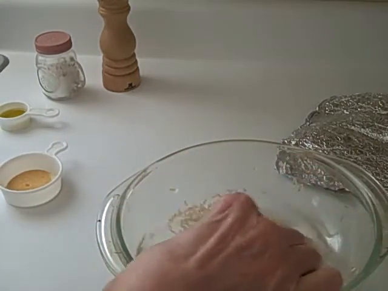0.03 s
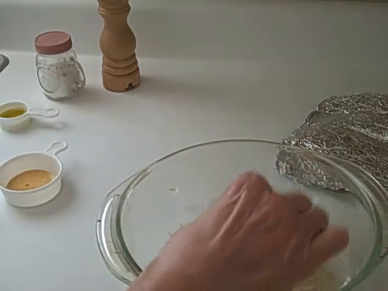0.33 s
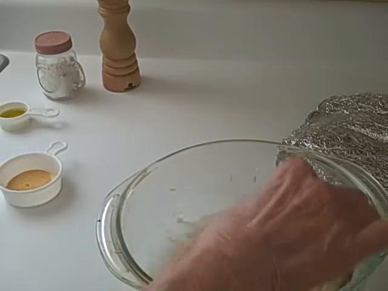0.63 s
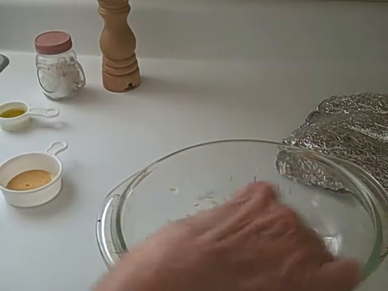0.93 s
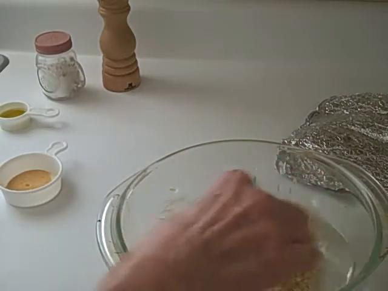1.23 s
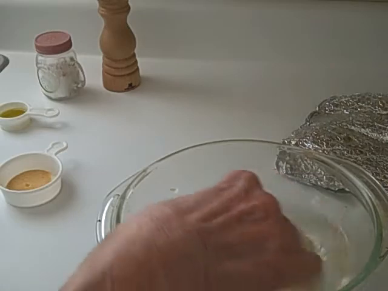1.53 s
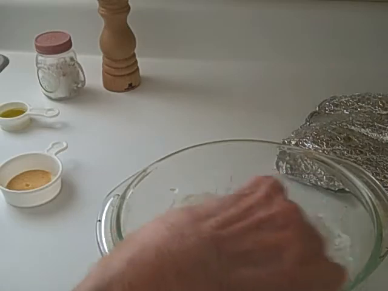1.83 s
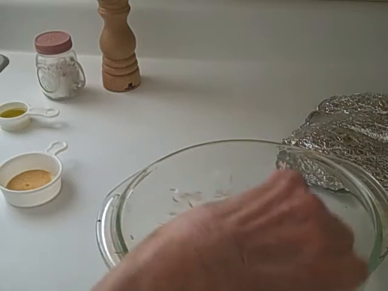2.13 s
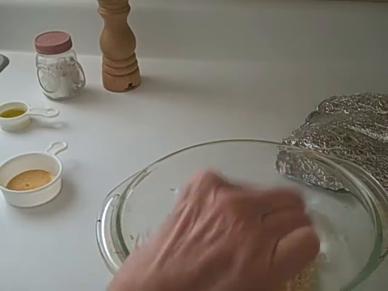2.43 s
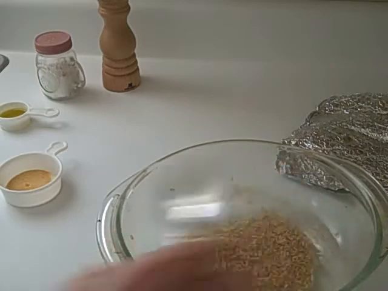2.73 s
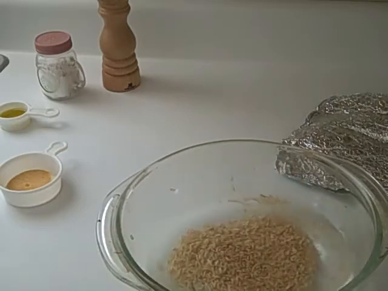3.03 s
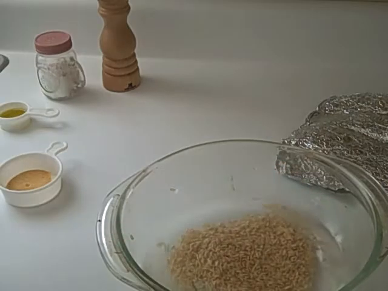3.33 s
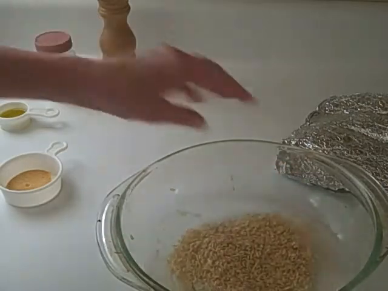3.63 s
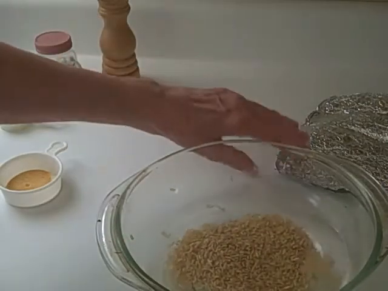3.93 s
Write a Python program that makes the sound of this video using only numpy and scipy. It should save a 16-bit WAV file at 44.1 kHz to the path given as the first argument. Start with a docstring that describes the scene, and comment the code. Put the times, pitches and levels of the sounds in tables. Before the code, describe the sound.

In a small kitchen, dry rice slides around a glass dish under a hand, with light finger bumps and skittering grains. It stops, an arm swishes softly, and several short knocks ring the counter and glass over faint hiss.

```python
"""Kitchen counter, small room: a hand spreads dry rice around a glass dish in several strokes.
Grains tick on the glass and excite the hollow under the hand; fingers bump the dish and stray
grains fall. A faint tone wavers and one finger squeaks. After a pause the arm swishes away and
back, and knocks ring counter and glass. Low rumble and hiss lie underneath."""
import sys
import numpy as np
from scipy import signal
from scipy.fft import rfft, irfft
from scipy.io import wavfile
from scipy.ndimage import uniform_filter1d

SR = 44100
rng = np.random.default_rng(int(sys.argv[2]) if len(sys.argv) > 2 else 0)


def to_wav(s):
    """Save 16-bit WAV."""
    ch = np.atleast_2d(s).T  # columns
    pcm = np.round(np.clip(ch, -1, 1) * 32767)  # PCM
    wavfile.write(sys.argv[1], SR, pcm.astype(np.int16))


N = 176400
TIME_S = np.arange(N) / SR

# room decay (frequency [Hz], t60 [s])
ROOM_T60 = [(300, 0.25), (800, 0.47), (2100, 0.25), (5500, 0.16), (14000, 0.22)]
# early reflections (delay [s], gain)
REFLECTIONS = [(.0023, 0.051), (.0047, -0.25), (.011, .2)]
# background spectrum (frequency [Hz], relative level [dB])
FLOOR_SPECTRUM = [(10, 9.5), (28, -6), (45, -9), (100, -10.5), (140, -12.5), (480, -14.5), (900, -16.5),
                  (1700, -17.5), (4000, -23), (9000, -26), (12000, -32), (15500, -33)]
# faint tone; finger squeak on glass (time [s], pitch [Hz], level [dB])
FAINT_TONE = [(1.23, 598, -82), (1.3, 600, -68.5), (1.36, 625, -65.5), (1.43, 610, -67), (1.53, 608, -72.5),
              (1.6, 597, -79)]
FINGER_SQUEAK = [(1.816, 1420, -75), (1.824, 1500, -51), (1.831, 1600, -58), (1.84, 1780, -55),
                 (1.85, 1930, -55), (1.862, 2000, -72)]

# arm swishes (time [s], level [dB])
AWAY_LEVEL = [(3.08, -80), (3.14, -65), (3.172, -52.5), (3.21, -55), (3.245, -60), (3.265, -56),
              (3.28, -61), (3.298, -55), (3.33, -64.5), (3.42, -64), (3.46, -62)]
BACK_LEVEL = [(3.5, -59), (3.6, -58.5), (3.72, -58.5), (3.78, -59.5), (4.0, -56)]
# swish and blow spectra (frequency [Hz], relative level [dB])
AWAY_SPECTRUM = [(180, -77), (300, -20), (337, -32), (794, -5.5), (877, -16), (1330, -4.5), (2320, -6.5),
                 (7250, -9.5), (15500, -22.5)]
BACK_SPECTRUM = [(180, -54), (300, -21), (492, -7), (600, -10), (794, -13), (1140, -5), (1440, -7.5),
                 (2740, -9.5), (3340, -7.5), (4420, -19), (9140, -23), (15500, -37)]
THUD_SPECTRUM = [(100, -31), (270, -12.5), (370, -22.5), (490, -5), (1000, 1.5), (1500, 0), (2400, -1),
                 (3200, -14), (5000, -26), (9000, -43), (15000, -48)]
TICK_SPECTRUM = [(500, -28), (2500, -2), (4200, 4.5), (6000, -3), (9000, -6.5), (12000, -17), (15500, -16)]
# knocks (time [s], thud [dB], thud decay [s], tick [dB], counter [dB], clack [dB], glass [dB], rim [dB])
BLOWS = [(3.3877, -56, 0.0067, -48, -58.5, -66, -80, -80),
         (3.4349, -24, 0.0036, -36.5, -39, -29.5, -68, -73), (3.4431, -32, 0.0041, -49, -54, -56, -78, -78),
         (3.7892, -41, 0.016, -35.5, -45.5, -36, -39.5, -50),
         (3.9062, -33.5, 0.0038, -41, -46, -26, -59, -61), (3.9088, -38.5, 0.0042, -47, -56, -28, -70, -72),
         (3.9508, -42, 0.008, -50, -45.5, -52, -59, -47.5)]
# struck modes (frequency [Hz], relative level [dB], t60 [s])
COUNTER_MODES = [(460, -8.5, 0.15), (547, -4, 0.085), (683, -2, 0.11), (841, -10.5, 0.3), (996, -6, 0.18),
                 (1067, -7, 0.15), (1260, 0, 0.11), (1383, 0.5, 0.096), (1500, -12, 0.21),
                 (1647, -19, 0.13), (1790, 2, 0.055), (2444, -15, 0.1)]
CLACK_MODES = [(1340, -2, 0.035), (1990, -6.5, 0.023), (2270, -13, 0.068), (2670, -6.5, 0.044),
               (3230, -11.5, 0.025), (5300, -24.5, 0.056), (9050, -26, 0.027), (10620, -26, 0.046)]
GLASS_MODES = [(1794, -1, 0.093), (4011, -8, 0.068), (7050, 4.5, 0.058), (7075, -23, .24),
               (9530, -7, 0.093), (10570, -8.5, 0.06), (13570, -22, 0.055)]
RIM_MODES = [(3380, -1, 0.11), (4260, -3, 0.047), (6130, -1.5, 0.16), (9600, -6, 0.085)]
DISH_LOW_MODES = [(1899, -7.5, 0.13), (2975, 1.5, 0.12), (3980, -0.5, 0.027)]

# hand strokes, one list each (time [s], relative body level [dB], relative treble level [dB])
HAND_STROKES = [
    [(0.0, -48, -54), (0.02, -52.5, -51), (0.134, -51.5, -56), (0.22, -65, -74.5), (0.254, -62, -62.5),
     (0.406, -54, -55), (0.58, -73, -69.5)],
    [(0.66, -64.5, -69), (0.666, -73, -73), (0.734, -63, -65), (0.74, -78, -80), (0.75, -64, -58),
     (0.758, -64, -77), (0.785, -63, -65)],
    [(0.845, -53.5, -62), (0.899, -51, -58), (0.911, -49, -50.5), (0.947, -53, -53), (1.051, -42.5, -45.5),
     (1.153, -56.5, -55), (1.17, -53, -55.5)],
    [(1.23, -56, -54.5), (1.26, -52.5, -47.5), (1.27, -57, -70), (1.36, -64, -70), (1.41, -66, -58),
     (1.424, -66.5, -82), (1.5, -61, -57.5)],
    [(1.53, -48, -52), (1.568, -44.5, -52.5), (1.64, -49, -43.5), (1.702, -51, -55.5), (1.778, -51, -53.5),
     (1.79, -60, -60), (1.81, -64, -72)],
    [(1.83, -50.5, -51.5), (1.894, -53.5, -53), (1.962, -43, -49.5), (2.044, -53, -47), (2.06, -56, -56),
     (2.15, -43.5, -50.5), (2.22, -54.5, -62)],
    [(2.25, -52, -62), (2.276, -46, -46), (2.312, -48, -49.5), (2.398, -72.5, -76.5), (2.522, -77, -72),
     (2.604, -79, -86), (2.65, -88, -90)],
]
# fingers bump rice against the dish (time [s], body [dB], treble [dB], decay [s], ring [dB])
FINGER_BUMPS = [(0.019, -37, -61, 0.0068, -39), (0.044, -46, -59, 0.0094, -46.5),
                (0.062, -48, -58, 0.013, -39), (0.7961, -30, -38, 0.0049, -38.5),
                (0.91, -42, -46, 0.0077, -70), (1.1931, -37.5, -36, 0.0062, -57),
                (1.286, -46.5, -50.5, 0.006, -55), (1.5154, -33.5, -33, 0.0049, -51.5),
                (1.866, -37, -52, 0.0029, -75), (1.954, -40, -39, 0.0059, -53),
                (2.27, -37.5, -42, 0.0032, -54)]
# stray grains landing (time [s], level [dB])
STRAY_LANDINGS = [(0.4688, -42.5), (0.5675, -67), (0.602, -44), (0.605, -45), (0.632, -45.5), (0.669, -55),
                  (0.6843, -49.5), (0.7285, -56), (0.7501, -66)]
# envelope of skittering grains (time [s], level [dB])
SKITTER_LEVEL = [(0.25, -70), (0.47, -69), (0.58, -66), (0.75, -68.5), (1.05, -78), (1.3, -70),
                 (1.41, -69.5), (1.65, -64.5), (2.3, -60.5), (2.38, -75), (2.52, -80), (2.6, -83)]
# grains on glass (frequency [Hz], relative level [dB])
BODY_SPECTRUM = [(200, -18), (450, -21), (700, 1.5), (950, -9.5), (1500, -18), (2500, 1), (4500, -8.5),
                 (5200, -18.5)]
TREBLE_SPECTRUM = [(2500, -51), (4400, -17.5), (5000, -9.5), (7200, -2), (8000, -6.5), (9500, -6),
                   (10400, -11.5), (12000, -18.5), (13700, -8), (15600, -23)]
# bright dish resonances (frequency [Hz], width [Hz], relative gain [dB])
DISH_BRIGHT_MODES = [(5480, 170, 10.5), (6000, 70, 1.5), (5950, 54, 3.5), (6665, 44, 6.5), (8930, 170, 6.5),
                     (9700, 110, 4), (11120, 190, 7.5)]
# hollow between hand and dish (time [s], pitch [Hz])
HOLLOW_PITCH = [(0.0, 1960), (0.09, 1967), (0.47, 1747), (0.84, 1857), (0.91, 2035), (1.24, 1944),
                (1.3, 1700), (1.62, 1970), (1.77, 1966), (2.1, 1990), (2.21, 1796), (2.31, 2063),
                (2.37, 2000), (2.4, 2090)]
# its resonances (rest frequency [Hz], width [Hz], relative gain [dB], pitch-tracking exponent)
HOLLOW_MODES = [(1296, 55, 2.5, 0.5), (2024, 156, 0.9, 1), (2530, 93, -8.5, 0.96), (3070, 101, 5.5, 0.5),
                (3720, 48, -2, 0.54), (4206, 180, -1, 0.28)]
# lift from hand shape (time [s], first mode [dB], second mode [dB], last mode [dB])
CUPPING_LIFT = [(0.05, 1.5, -0.5, -1), (0.4, 3, 2.5, -4), (0.8, -10, -6, 3), (0.92, 4.5, 0.5, -4),
                (1.06, -9, -6, -8), (1.27, 0, 3, 1.5), (1.6, -2, -1.5, 1.5), (1.95, -1, 1, -4),
                (2.15, -3, 0.5, -7.5), (2.3, -2, 6, -8)]


def amp(db):
    """Decibels to gain."""
    return 10 ** (np.asarray(db) / 20)


def unit(x):
    """Scale to rms 1."""
    return x / np.sqrt(np.mean(x ** 2) + 1e-20)


def curve(rows, column=1):
    """Piecewise-linear control curve."""
    rows = np.asarray(rows)
    return np.interp(TIME_S, rows[:, 0], rows[:, column])


def level(rows, column=1):
    """Gain from a dB curve, zero outside its span."""
    return (TIME_S >= rows[0][0]) * (TIME_S <= rows[-1][0]) * amp(curve(rows, column))


def lookup(points, hz):
    """Interpolate over log frequency."""
    points_hz, values = np.transpose(points)
    return np.interp(np.log(hz + 1), np.log(points_hz + 1), values)


def colour(x, spectrum):
    """Minimum-phase filter; white noise keeps its power."""
    log_gain = np.log(amp(lookup(spectrum, abs(np.fft.fftfreq(4096, 1 / SR)))))
    taps = np.fft.ifft(np.exp(np.conj(signal.hilbert(log_gain)))).real[:2048]
    return signal.oaconvolve(x, taps / np.linalg.norm(taps))[:N]


def wander(rate_hz):
    """Smooth noise, rms 1."""
    lowpass = np.exp(-(np.fft.rfftfreq(N, 1 / SR) / rate_hz) ** 2)
    return unit(irfft(rfft(rng.standard_normal(N)) * lowpass, N))


def swaying_resonance(x, hz, width_hz, sway=0.017):
    """Unity-gain resonance; pitch sways at random as the fingers move."""
    pitch_hz = hz * (1 + sway * wander(rate_hz=14))
    carrier = np.exp(2j * np.pi * np.cumsum(pitch_hz) / SR)
    pole = np.exp(-np.pi * width_hz / SR)
    return 2 * (carrier * signal.lfilter([1 - pole], [1, -pole], x / carrier + 1e-18)).real


def fall(start_s, decay_s):
    """Step onset, exponential decay."""
    return (TIME_S >= start_s) * np.exp(-np.minimum(abs(TIME_S - start_s) / decay_s, 60))


def ring(start_s, modes):
    """Damped sines of alternating sign from one blow."""
    t = np.arange(SR // 2) / SR
    sines = sum((-1) ** k * amp(db - 60 * t / t60_s) * np.sin(2 * np.pi * hz * t)
                for k, (hz, db, t60_s) in enumerate(modes))
    return np.pad(sines, (round(start_s * SR), N))[:N]


def grains(per_s, spread_db, clump_db):
    """Tiny clumped impacts of uneven size, at constant mean power."""
    size = amp(spread_db * np.clip(rng.standard_normal(N), -2, 2) + clump_db * wander(rate_hz=82))
    clicks = size * rng.choice([-1., 1.], N) * (rng.random(N) < per_s / SR)
    power = abs(uniform_filter1d(clicks ** 2, size=1500))
    return clicks / np.sqrt(power + 1e-6)


def room(x):
    """Diffuse kitchen tail with a decay time per band."""
    t = np.arange(SR) / SR
    noise = rng.standard_normal(SR) * np.clip((t - 0.004) / 0.008, 0, 1)
    hz, age_s, bands = signal.stft(noise, SR, nperseg=256)
    decay = amp(-60 * age_s / lookup(ROOM_T60, hz)[:, None])
    tail = signal.istft(bands * decay, SR, nperseg=256)[1]
    return signal.oaconvolve(x, tail / np.linalg.norm(tail))[:N]


def noise_floor(level_db=-63.5):
    """Steady rumble and hiss."""
    gain = amp(lookup(FLOOR_SPECTRUM, np.fft.rfftfreq(N, 1 / SR)))
    return amp(level_db) * unit(irfft(rfft(rng.standard_normal(N)) * gain, N))


def tone(rows, waver, waver_hz):
    """Sine with unsteady pitch."""
    hz = curve(rows) * (1 + waver * wander(waver_hz))
    return level(rows, column=2) * unit(np.sin(2 * np.pi * np.cumsum(hz) / SR))


def finger_squeak():
    """A finger slips on the glass: rough rising note."""
    return tone(FINGER_SQUEAK, waver=0.06, waver_hz=423)


def arm_swishes():
    """Fine friction as the arm leaves the dish and returns."""
    away = colour(grains(per_s=5500, spread_db=2, clump_db=0.5), AWAY_SPECTRUM)
    back = colour(grains(per_s=9000, spread_db=3.5, clump_db=1), BACK_SPECTRUM)
    return level(AWAY_LEVEL) * away + level(BACK_LEVEL) * back


def knocks(tick_decay_s=0.0034, highpass_hz=410, room_db=-8.5):
    """Each blow gives a thud and a tick and rings counter and glass."""
    mode_sets = COUNTER_MODES, CLACK_MODES, GLASS_MODES, RIM_MODES
    thud = tick = ringing = 0
    for start_s, thud_db, decay_s, tick_db, *rings_db in BLOWS:
        thud += amp(thud_db) * fall(start_s, decay_s)
        tick += amp(tick_db) * fall(start_s, tick_decay_s)
        ringing += sum(amp(db) * ring(start_s, modes) for db, modes in zip(rings_db, mode_sets))
    thud_noise, tick_noise = rng.choice([-1., 1.], (2, N))
    contact = colour(thud_noise * thud, THUD_SPECTRUM) + colour(tick_noise * tick, TICK_SPECTRUM)
    ringing = signal.sosfilt(signal.butter(4, highpass_hz, "high", fs=SR, output="sos"), ringing)
    echoes = sum(gain * np.interp(TIME_S - delay_s, TIME_S, contact) for delay_s, gain in REFLECTIONS)
    early = ringing + contact + echoes
    return early + amp(room_db) * room(early)


def skitter(per_s=300, low_hz=4200, high_hz=11000, width_hz=360, pitches=24):
    """Loose grains ping on the glass, each at a random pitch."""
    size = amp(3.5 * np.minimum(rng.exponential(1, N), 3))
    hits = size * (rng.random(N) < per_s / SR)
    pitch_index = rng.integers(0, pitches, N)
    t = np.arange(600) / SR
    decay = np.exp(-np.pi * width_hz * t)
    pings = sum(signal.oaconvolve(hits * (pitch_index == k), np.sin(2 * np.pi * hz * t) * decay)[:N]
                for k, hz in enumerate(np.geomspace(low_hz, high_hz, pitches)))
    return level(SKITTER_LEVEL) * unit(pings)


def hand_reflections(x, depth_db=3.3, patch_hz=95, patch_s=0.032):
    """Reflections off the moving hand: random drifting peaks and notches."""
    frame, hop = 512, 128
    bands = signal.stft(x, SR, nperseg=frame, noverlap=frame - hop)[2]
    field = rng.standard_normal(bands.shape)
    for axis, sigma in enumerate([patch_hz * frame / SR, patch_s * SR / hop]):
        kernel = np.expand_dims(signal.windows.gaussian(81, sigma), 1 - axis)
        field = signal.fftconvolve(field, kernel, "same")
    gain = unit(amp(depth_db * np.clip(unit(field), -2, 2)))
    return signal.istft(bands * gain, SR, nperseg=frame, noverlap=frame - hop)[1][:N]


def hollow(x, rest_hz=1970, band_hz=(1100, 5200), dull_db=-14.5):
    """Air between hand and dish resonates, shifting with the hand, over a dull grain sound."""
    shift = curve(HOLLOW_PITCH) / rest_hz
    first_db, second_db, last_db = (curve(CUPPING_LIFT, column) for column in (1, 2, 3))
    lifts_db = [first_db, second_db, 0, 0, 0, last_db]
    ringing = sum(amp(db + lift_db) * swaying_resonance(x, hz * shift ** tracking, width_hz)
                  for (hz, width_hz, db, tracking), lift_db in zip(HOLLOW_MODES, lifts_db))
    ringing = signal.sosfilt(signal.butter(3, band_hz, "band", fs=SR, output="sos"), ringing)
    power = sum(amp(db) ** 2 * np.pi * width_hz / SR for _, width_hz, db, _ in HOLLOW_MODES)
    return ringing / np.sqrt(power) + amp(dull_db) * colour(x, BODY_SPECTRUM)


def shimmer(x):
    """Rice ticks excite the bright modes of the dish."""
    ringing = sum(amp(db) * swaying_resonance(x, hz, width_hz) for hz, width_hz, db in DISH_BRIGHT_MODES)
    return colour(0.29 * x + 0.71 * ringing, TREBLE_SPECTRUM)


def finger_bumps(noise, rise_s=0.0012):
    """Fingers push rice against the dish: body burst, treble burst, low ring."""
    body = treble = ringing = 0
    for start_s, body_db, treble_db, decay_s, ring_db in FINGER_BUMPS:
        burst = noise * (fall(start_s, decay_s) - fall(start_s, rise_s))
        body += amp(body_db) * burst
        treble += amp(treble_db) * burst
        ringing += amp(ring_db) * ring(start_s, DISH_LOW_MODES)
    return body, treble, ringing


def rice(peak_grains_per_s=7500, body_db=-2, treble_db=1, stray_body_db=-16.5, room_db=-10.5):
    """Strokes slide the grains, more of them when faster; bumps and strays add sharp bursts."""
    strokes = np.vstack(HAND_STROKES)
    body_gain = amp(body_db) * level(strokes, column=1)
    treble_gain = amp(treble_db) * level(strokes, column=2)
    per_s = peak_grains_per_s * (treble_gain / treble_gain.max()) ** 0.3
    sliding = grains(per_s, spread_db=3.5, clump_db=1.5)
    noise = rng.choice([-1., 1.], N)
    bump_body, bump_treble, dish_ring = finger_bumps(noise)
    strays = noise * sum(amp(db) * fall(start_s, decay_s=0.0028) for start_s, db in STRAY_LANDINGS)
    body = hollow(body_gain * sliding + bump_body + amp(stray_body_db) * strays)
    treble = shimmer(treble_gain * sliding + bump_treble + strays)
    direct = hand_reflections(body + treble) + dish_ring + skitter()
    return direct + amp(room_db) * room(direct)


def scene():
    """Mono sum of all sources."""
    tones = tone(FAINT_TONE, waver=0.015, waver_hz=50.3) + finger_squeak()
    return (tones + rice() + arm_swishes() + knocks() + noise_floor())[None]


def record(dry):
    """Steep low-pass."""
    cutoff_hz = 15780
    taps = signal.firwin(511, cutoff_hz, window=("kaiser", 9), fs=SR)
    return signal.oaconvolve(dry, taps[None], "same")


dry = scene()
out = record(dry)
to_wav(out)
```